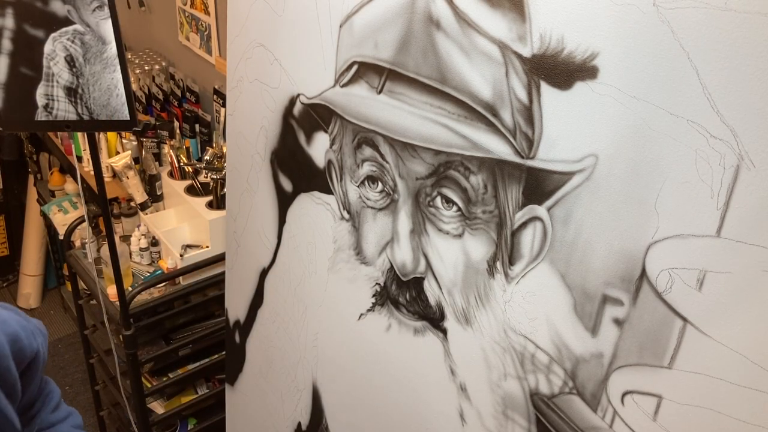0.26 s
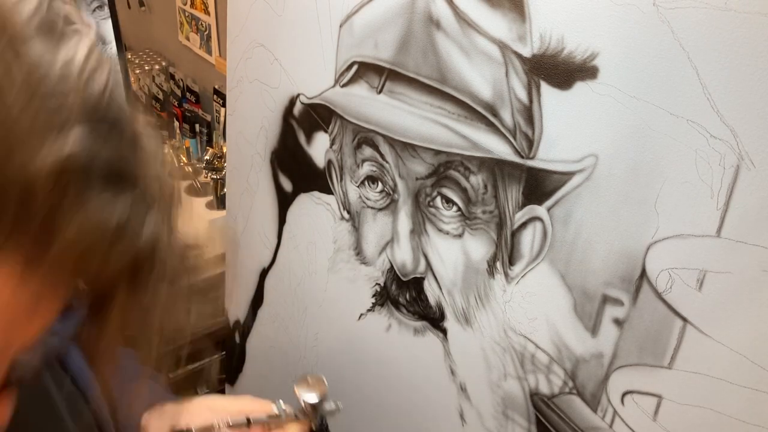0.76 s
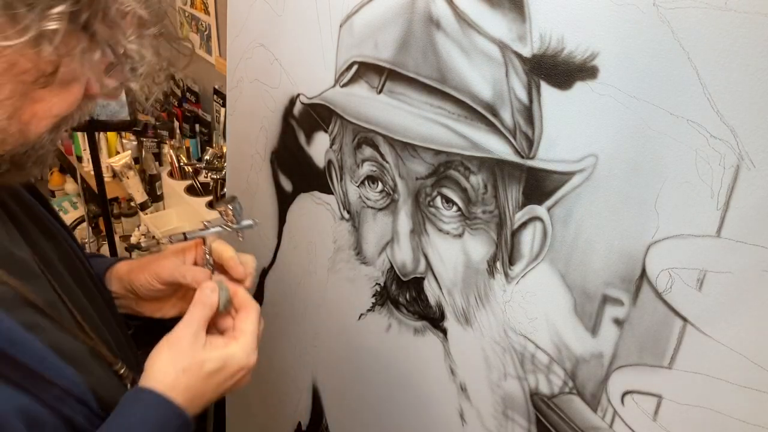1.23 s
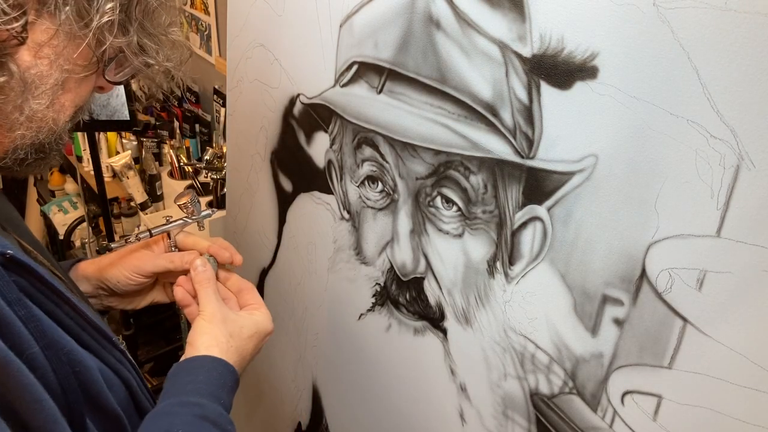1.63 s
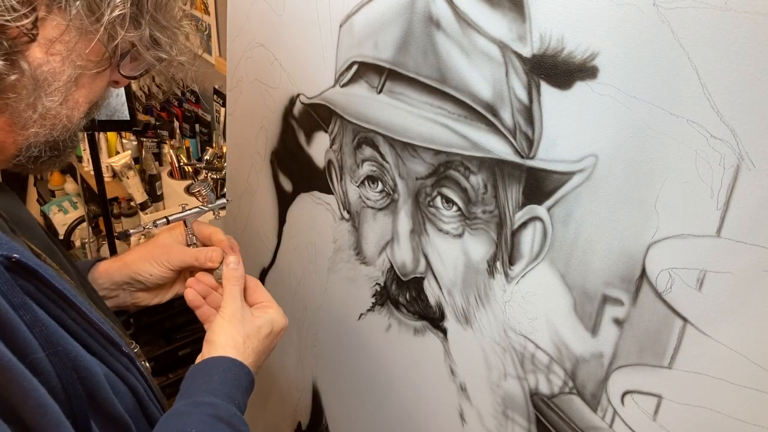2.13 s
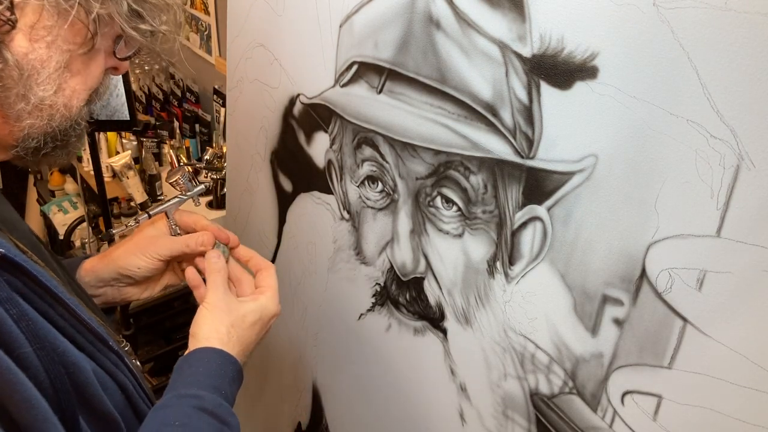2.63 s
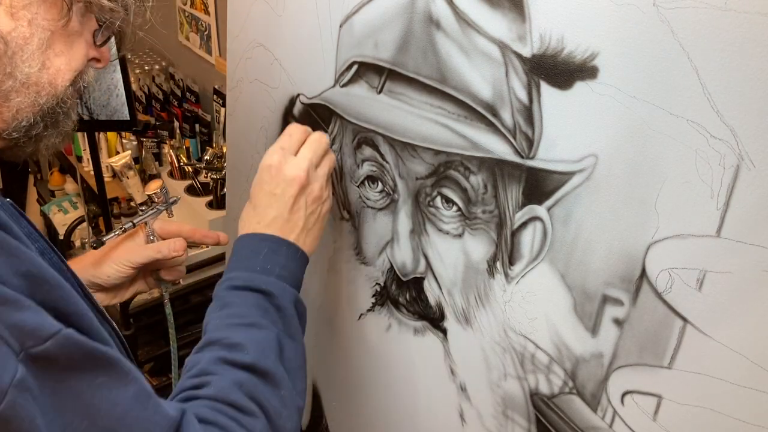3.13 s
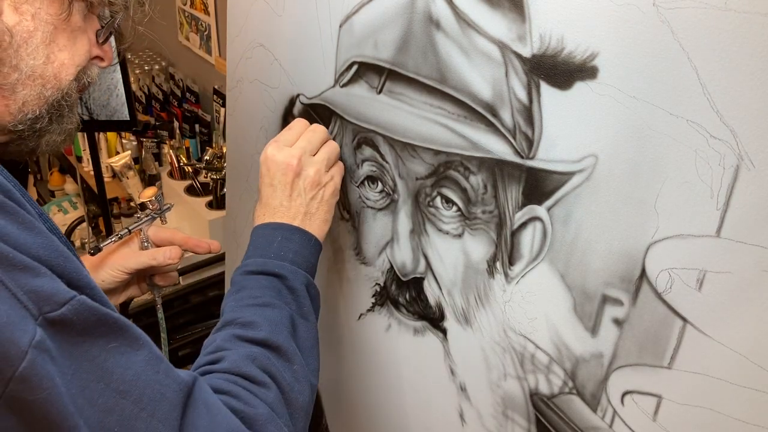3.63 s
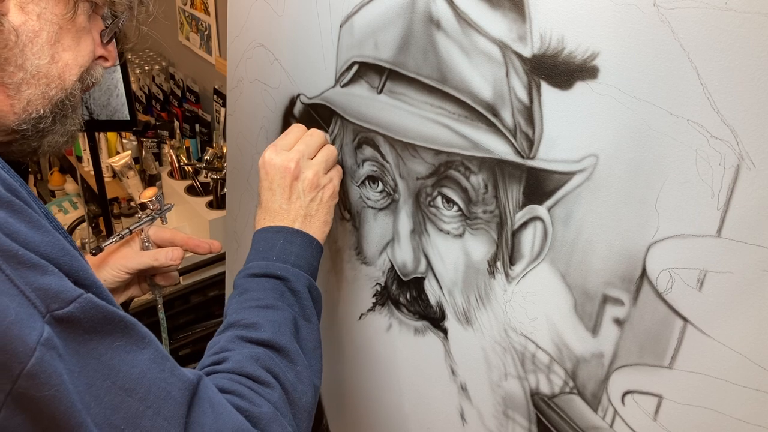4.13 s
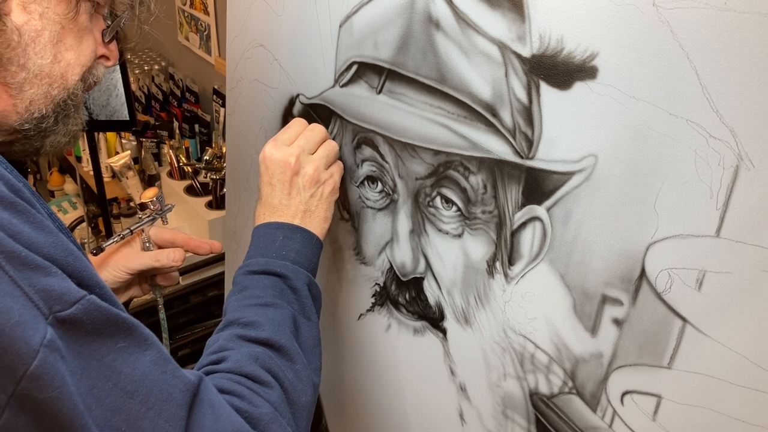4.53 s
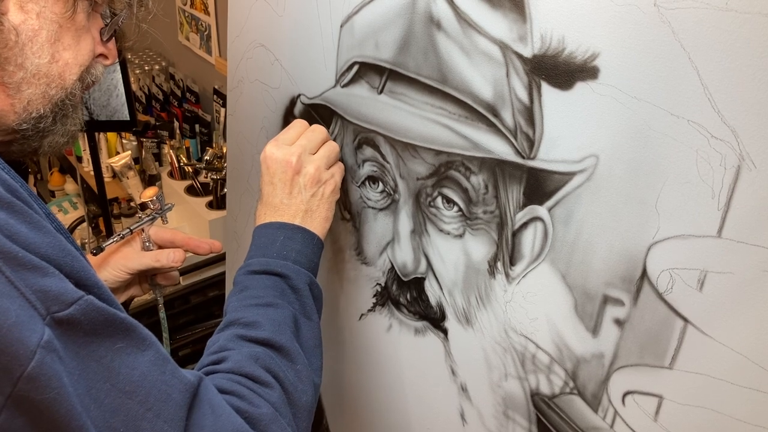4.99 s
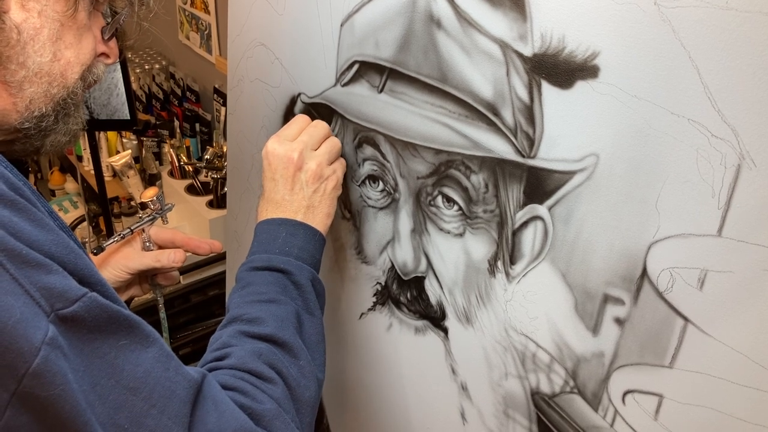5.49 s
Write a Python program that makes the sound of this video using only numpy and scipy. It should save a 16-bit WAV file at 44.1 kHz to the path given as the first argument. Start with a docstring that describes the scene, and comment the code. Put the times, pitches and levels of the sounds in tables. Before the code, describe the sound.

A small air compressor runs with a steady droning hum, fine rattle and hiss, with a few faint scuffs and ticks nearby.

```python
"""From the start, a small piston air compressor runs in a studio, to the right of a two-port microphone.
Two strokes a turn drum on its tank, the housing buzzes, the valves tick and hiss, and the fan rushes
over a soft room rumble. At 0.2 s a painter's hands give the first faint scuff. Near 0.6 s the painter
leans in and the drone changes colour; near 0.9 s a passing head briefly lifts its middle tones.
More scuffs, ticks and a few thin, brief rings follow, while the compressor runs steadily to the end."""
import sys
import numpy as np
from scipy import signal
from scipy.fft import rfft, irfft
from scipy.io import wavfile

SR = 44100
rng = np.random.default_rng(int(sys.argv[2]) if len(sys.argv) > 2 else 0)


def inscribe(sig):
    """Save sig as 16-bit PCM at rate SR to the path in sys.argv[1].

    A 1-D sig is mono; a 2-D sig holds one channel per row.
    Samples are clipped to [-1, 1] before scaling.
    """
    pcm = np.round(np.clip(np.atleast_2d(sig).T, -1, 1) * 32767)
    wavfile.write(sys.argv[1], SR, pcm.astype(np.int16))


N = 253575
TIME = np.arange(N) / SR
FREQS = np.fft.rfftfreq(N, 1 / SR)
PORT_LAG_S = .000268  # sound reaches the microphone's left opening this much later


# Piston strokes: place/turns, relative level/dB, direction (1 pushes, -1 pulls)
PISTON_STROKES = [(.28, 0, 1), (.891, -3.2, -1)]
# Pitches at which the tank (152 Hz) and the room near the floor (283, 351 Hz) like to ring: f/Hz, width/Hz
TANK_AND_ROOM_RESONANCES = [(152, 12), (283, 12), (351, 12)]
# Drone tones: f/shaft speed, level/dB, left minus right/dB, change on leaning in/dB, drift/(dB per s)
DRONE_TONES = [(2, -31.3, -.5, 0, 0), (3, -45.5, -1, 0, 0), (4, -40, -2, 1.5, -1), (5, -41.2, -2, 0, 0),
               (6, -29.9, -3, 0, .5), (7, -30.8, -2, 0, .2), (8, -29.5, 0, 0, .1), (9, -40.6, 1, -4, .5),
               (10, -45.3, -2, 2, 0), (11, -51.3, 5, 5, 1), (12, -45.5, -7, 2.5, 1), (13, -45.3, 0, 0, .3),
               (14, -44.5, 2, 0, -.8), (15, -54, -3, 1, -1.8), (16, -56, -6, 4, -.8),
               (17, -48.3, -5, 4, .6), (18, -59.3, -2, 3, 1), (19, -59, 0, 0, 0), (21, -54.8, 0, 6, 0),
               (22, -59, -10, 0, 1), (23, -48.3, -9, 5, .2), (24, -57.5, -4, 0, 0), (25, -61, -7, -7, 0),
               (26, -59.7, 3, 0, 0), (27, -49, -3, 5, 0), (28, -55.5, -6, 0, .3), (29, -46.3, -6, 3, .5),
               (30, -60, 0, 0, 0), (31, -45.7, -6, 0, 0), (32, -53.5, 0, -5, 1.8), (33, -56.5, 3, 0, 1),
               (34, -45, -10, 2, .2), (35, -61, 0, 0, 0), (36, -58.5, -13, 0, 0), (37, -58, -14, 0, 0),
               (38, -58.5, 1, 0, 0), (40, -59, -16, 0, 0), (41, -57, 2, -2, 0), (42, -57, 0, 4, .5),
               (43, -57, 2, 0, 0)]

def tank_drone(turns, trim_db=-.16, scatter_hz=700, spread_hz=1500):
    """Two strokes a turn ring the tank; the room's reflections shift as the painter moves."""
    not_leaning = (1 - np.tanh((TIME - .62) / .25)) / 2  # falls towards 0 as the painter leans in
    head_db = 3.2 * np.exp(-((TIME - .92) / .25) ** 2)  # sound bounces off the passing head
    out = 0
    for multiple, db, pan_db, lean_db, drift in DRONE_TONES:
        hz = multiple * SHAFT_HZ
        # The strokes and the ringing of tank and room set the phase: where in its cycle each tone starts.
        push = sum(direction * undb(stroke_db) * np.exp(-2j * np.pi * multiple * place)
                   for place, stroke_db, direction in PISTON_STROKES)
        ringing = np.prod([hz ** 2 - centre ** 2 - 1j * hz * width for centre, width in TANK_AND_ROOM_RESONANCES])
        shared, apart = rng.standard_normal(2)  # reflections scramble the higher tones most
        phase = np.angle(push / ringing) + shared * (hz / scatter_hz) ** 2
        left_lag = 2 * np.pi * hz * PORT_LAG_S + apart * (hz / spread_hz) ** 2
        tone = shaft_tone(turns, multiple, phase, left_lag, waver=.015 + .17 * (hz / 1000) ** 2)
        middle_share = np.exp(-((hz - 680) / 200) ** 2)
        swell_db = drift * (TIME - TIME.mean()) - lean_db * not_leaning + head_db * middle_share
        sides = level(undb(np.array([[pan_db], [-pan_db]]) / 2), db + trim_db)
        out = out + sides * undb(swell_db) * tone
    return out


# Tone colour of the rush: f/Hz, relative level/dB; the treble is left with deep gaps
RUSH_SPECTRUM = [(250, 4), (500, 3), (900, 4), (1150, 6.5), (1350, 3), (1700, 5.5), (2000, 3.5),
                 (3000, -1.5), (3500, -3), (4600, -2.5), (6500, -3), (8000, -20.5), (11000, -8),
                 (13500, -19), (16000, -53)]

def cooling_fan(level_db=-41, waver_db=1.5):
    """The fan pushes air in a steady, slightly fluttering rush."""
    rush = rng.standard_normal((3, N)) * undb(waver_db * wander(15))
    return level(colour(two_ports(rush, room_db=-3), RUSH_SPECTRUM), level_db)


# Tone colour of the clatter: f/Hz, relative level/dB; the treble is left with a deep gap
RATTLE_SPECTRUM = [(400, -16), (900, -4), (1100, 2), (1300, 2.5), (1600, 3), (2000, -2), (2600, -5.5),
                   (3100, 2.5), (3600, 1), (3900, 0.5), (4900, -2), (5600, -2.5), (6500, -16), (7700, -1),
                   (9000, -49), (15000, -36)]

def piston_rattle(turns, level_db=-44.5, uneven_db=.5):
    """Piston and bearings make the same clatter on every turn, a little louder or softer."""
    clatter = repeating_noise(turns) * undb(uneven_db * wander(23))
    return level(colour(two_ports(clatter, room_db=9.5), RATTLE_SPECTRUM), level_db)


# Valve flaps lifting: place/turns, fade time/turns, relative level/dB
VALVE_FLAPS = [(1, 0.076, -24), (0.07, 0.11, -4.5), (.28, 0.086, 1), (0.81, .12, 1.5)]
# Tone colour of the valves' ticks and hiss: f/Hz, relative level/dB
VALVE_SPECTRUM = [(1500, -18), (3200, -3.5), (4200, -0.5), (5300, 7), (6200, -3), (7000, -4), (7450, 4),
                  (8100, 1), (8800, -13), (11000, -8), (16000, -56)]

def reed_valves(turns, level_db=-46.5, puff_db=-2, leak_db=-22, uneven_db=1):
    """Each flap ticks alike on every turn and lets out a fresh puff of air; both ring the reed plates."""
    tick_and_puff = repeating_noise(turns) + undb(puff_db) * rng.standard_normal((3, N))
    flow = undb(leak_db)  # a little air always leaks through
    for place, fade, db in VALVE_FLAPS:
        age = (turns - place) % 1 / fade
        flow = flow + undb(db) * np.tanh(2 * age) * np.exp(-age)  # opens fast, then dies away
    puffs = tick_and_puff * level(flow, 0) * undb(uneven_db * wander(28))
    return level(colour(two_ports(puffs, room_db=-6), VALVE_SPECTRUM), level_db)


# High tones that the housing picks out: f/shaft speed, level before the trim/dB
HOUSING_TONES = [(49, -59), (50, -59), (51, -53), (52, -60), (54, -56), (58, -54), (60, -58), (61, -59),
                 (63, -60), (79, -58), (91, -58), (93, -63), (99, -63), (100, -60), (103, -62), (106, -59),
                 (108, -61), (110, -60), (111, -61), (113, -58), (119, -63), (124, -63), (164, -63),
                 (166, -59), (168, -63), (171, -63), (173, -63), (178, -63), (180, -60), (182, -62),
                 (185, -58), (190, -62), (191, -60), (208, -64), (269, -65), (271, -65), (275, -66),
                 (276, -64)]

def housing_buzz(turns, trim_db=-4):
    """The metal housing shakes along with the shaft: a fine buzz that arrives from all around."""
    out = 0
    for multiple, db in HOUSING_TONES:
        phase, left_lag = 2 * np.pi * rng.random(), rng.standard_normal()
        out = out + undb(db + trim_db) * shaft_tone(turns, multiple, phase, left_lag, waver=.42)
    return out


# Hum at twice the mains frequency, and two shaft speeds above that: f/Hz, level/dB
HUM_TONES = [(120, -64), (177.4, -49)]

def motor_hum():
    """The iron in the induction motor vibrates with two low, even tones."""
    return sum(level(np.sin(2 * np.pi * hz * TIME), db) for hz, db in HUM_TONES)


# Tone colour of the room: f/Hz, relative level/dB
RUMBLE_SPECTRUM = [(20, -38), (36, -28), (48, 1), (60, -4.5), (78, 6.5), (97, -7), (115, 8), (135, -5.5),
                   (155, 3), (220, -7.5), (300, -8.5), (500, -33), (1200, -38)]

def room_rumble(level_db=-38):
    """The room rumbles low, nearly alike on both sides."""
    noise = rng.standard_normal((3, N))
    return level(colour(two_ports(noise, room_db=-16), RUMBLE_SPECTRUM), level_db)


# Short rubs and scuffs, plus three thin, brief rings near 3.5 kHz:
# t/s, f/Hz, width/octaves, half-length/s, level/dB
RUBS_AND_RINGS = [(0.225, 2200, .4, .025, -48), (1.336, 3520, .06, .025, -42), (2.134, 2050, .25, .03, -51),
                  (2.513, 2000, .22, .025, -51), (2.66, 4450, .18, .035, -44), (3.28, 2600, .2, 0.035, -49),
                  (4.05, 2400, 0.37, .03, -47), (4.22, 2600, .12, 0.033, -47), (4.42, 2100, .25, .03, -47),
                  (4.777, 3000, 0.81, 0.016, -43), (4.944, 4400, .3, .028, -43),
                  (5.274, 3500, .04, .05, -61), (5.5, 3520, .04, .12, -60), (5.543, 4800, 0.76, 0.023, -43),
                  (5.57, 2430, 0.22, 0.022, -45)]

def rubs_and_rings(grain_db=3.5, grain_hz=200):
    """Grainy bursts: the wide ones are hands and sleeves that stick and slip, the narrowest ring."""
    grains = rng.standard_normal((2, N)) * undb(grain_db * wander(grain_hz, size=8192))
    return sum(level(band(grains, hz, octaves), db) * np.exp(-((TIME - at) / half_length) ** 2)
               for at, hz, octaves, half_length, db in RUBS_AND_RINGS)


# Dry ticks where a rub catches: t/s, f/Hz, starting level/dB
CATCHES = [(0.211, 2100, -43), (.23, 2250, -40), (2.51, 2050, -41), (2.645, 4450, -38), (2.679, 4400, -43),
           (3.295, 2600, -36), (4.046, 2300, -42), (4.061, 2600, -40), (4.218, 2600, -42),
           (4.935, 4500, -39), (5.507, 5000, -37), (5.579, 2450, -43)]

def painter_ticks(fade_s=.0068, octaves=.24):
    """A rub catches and lets go: a sudden snap that dies in a few milliseconds."""
    noise = rng.standard_normal((2, N))
    return sum(level(band(noise, hz, octaves), db) * (TIME >= at) * np.exp(-abs(TIME - at) / fade_s)
               for at, hz, db in CATCHES)


def faint_ring(hz=3540, level_db=-55, waver_db=4):
    """A thin tone near 3.5 kHz comes and goes on top of the hiss."""
    ring = band(rng.standard_normal((2, N)), hz, octaves=.03)
    return level(ring * undb(waver_db * wander(6)), level_db)


def shaft_tone(turns, multiple, phase, left_lag, waver):
    """A wavering tone at a multiple of the shaft speed, left_lag radians later on the left."""
    angle = 2 * np.pi * multiple * turns + phase + np.array([[-left_lag], [left_lag]]) / 2
    return np.sqrt(2) * (1 + waver * wander(24.6)) * np.cos(angle)


def repeating_noise(turns, size=8192, tones=550):
    """Three noises, each one turn long, repeat as the shaft goes round."""
    one_turn = irfft(np.exp(2j * np.pi * rng.random((3, tones))), size)
    return level(np.array([np.interp(turns % 1, np.arange(size) / size, row) for row in one_turn]), 0)


def two_ports(sounds, room_db):
    """Row 0 is direct sound, late on the left; rows 1 and 2 are each side's room reflections."""
    direct, reflections = sounds[0], sounds[1:]
    late = irfft(rfft(direct) * np.exp(-2j * np.pi * FREQS * PORT_LAG_S), N)
    return np.array([late, direct]) + undb(room_db) * reflections


def wander(rate_hz, size=2048):
    """A smooth random wobble around zero, typically of size 1."""
    slow = FREQS[:size // 2 + 1]
    steps = irfft(rfft(rng.standard_normal(size)) * np.exp(-(slow / rate_hz) ** 2) * (slow > 0))
    return np.interp(TIME, np.linspace(0, N / SR, size), level(steps, 0))


def colour(x, spectrum):
    """Shape a sound's lows and highs with a table of f/Hz, level/dB."""
    hz, db = np.transpose(spectrum)
    return irfft(rfft(x) * undb(np.interp(np.log(FREQS + 1), np.log(hz), db)), N)


def band(x, hz, octaves):
    """Keep only the frequencies near hz."""
    return irfft(rfft(x) * np.exp(-(np.log2((FREQS + 1) / hz) / octaves) ** 2), N)


def level(x, db):
    """Scale a sound to an average (rms) level."""
    return x * undb(db) / np.sqrt(np.mean(x ** 2))


def undb(db):
    """Turn decibels into a multiplier."""
    return 10 ** (np.asarray(db) / 20)


SHAFT_HZ, CREEP_HZ_PER_S = 28.681, .003  # turns a second, and their very slow rise

def scene():
    """One steady shaft drives drone, rattle, valves and buzz; the painter works beside it."""
    speed_hz = (SHAFT_HZ + CREEP_HZ_PER_S * TIME) * (1 + .0001 * wander(3))
    turns = np.cumsum(speed_hz) / SR
    compressor = tank_drone(turns) + housing_buzz(turns) + piston_rattle(turns) + reed_valves(turns)
    compressor += cooling_fan() + motor_hum()
    return compressor + room_rumble() + rubs_and_rings() + painter_ticks() + faint_ring()


def record(dry, top_hz=15800):
    """A steep filter cuts the highest treble."""
    return signal.sosfilt(signal.ellip(10, .1, 80, top_hz, fs=SR, output="sos"), dry)


dry = scene()
out = record(dry)
inscribe(out)
```